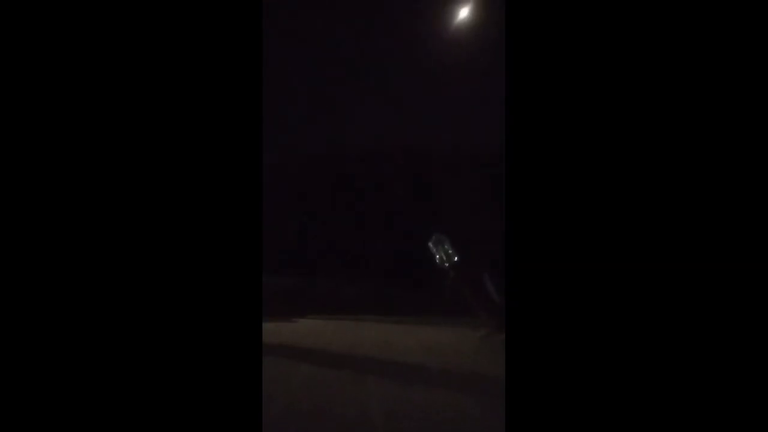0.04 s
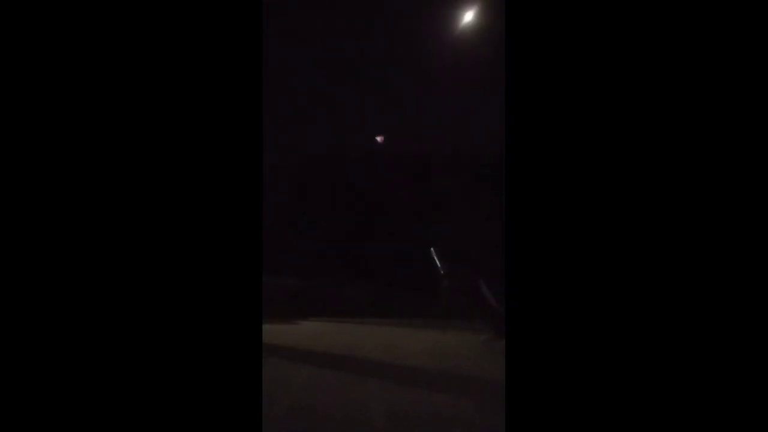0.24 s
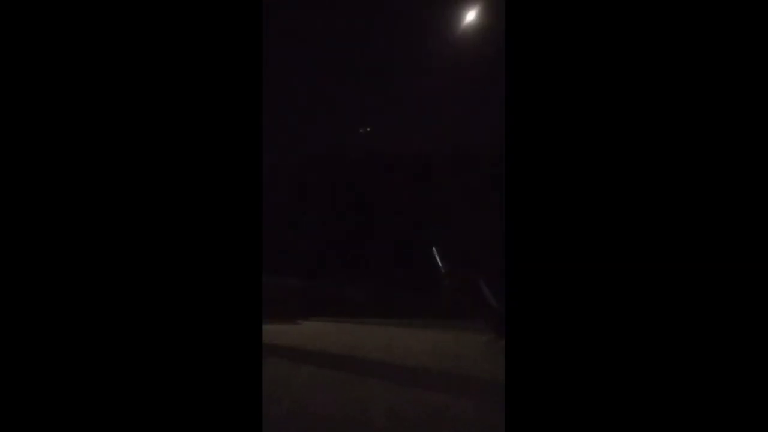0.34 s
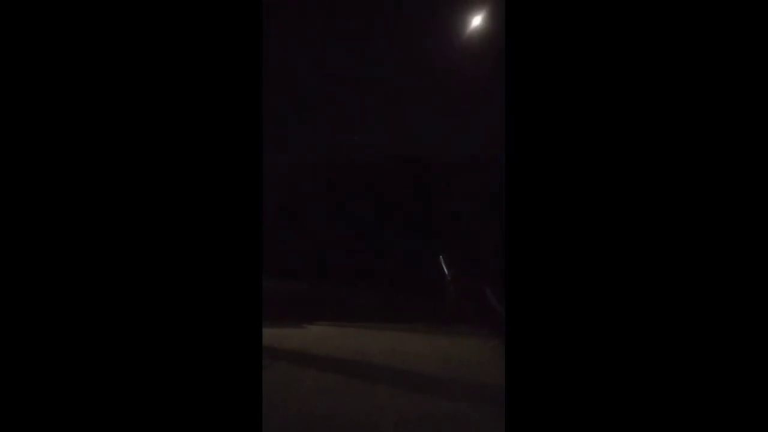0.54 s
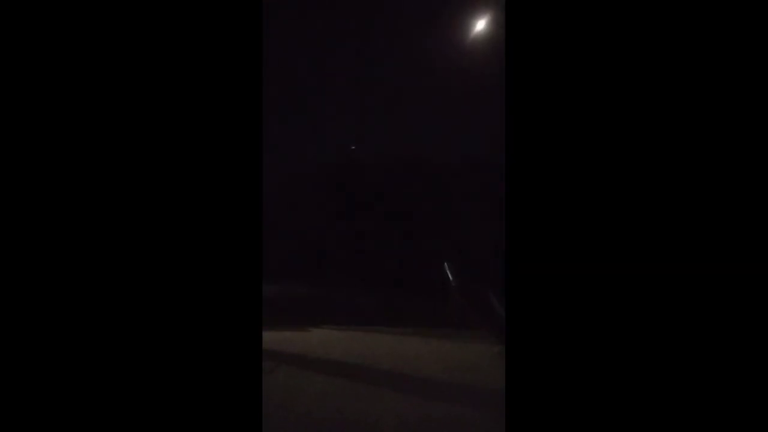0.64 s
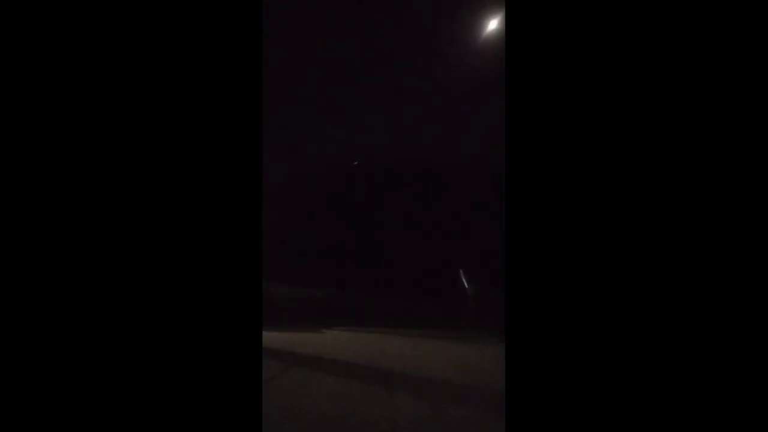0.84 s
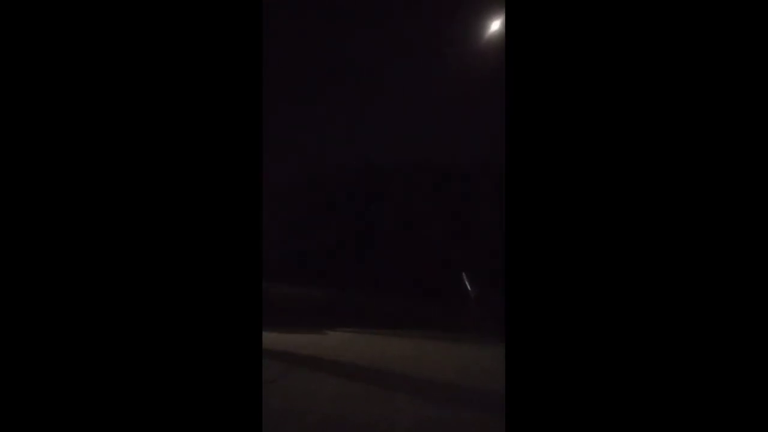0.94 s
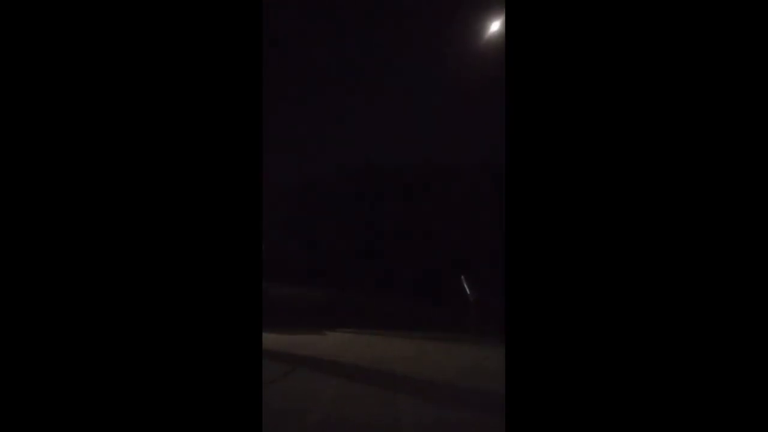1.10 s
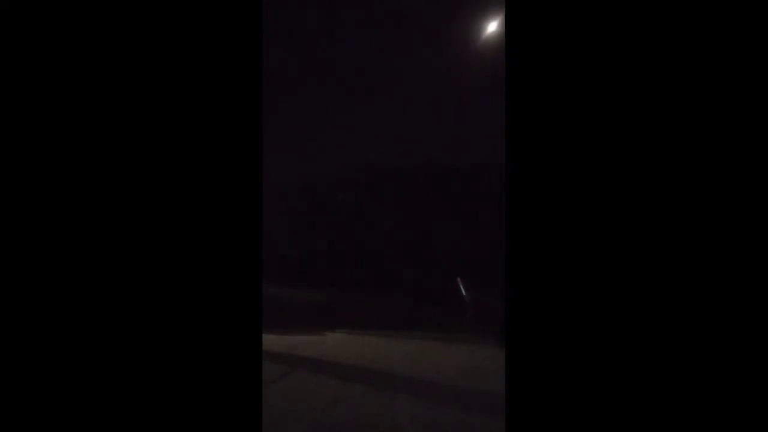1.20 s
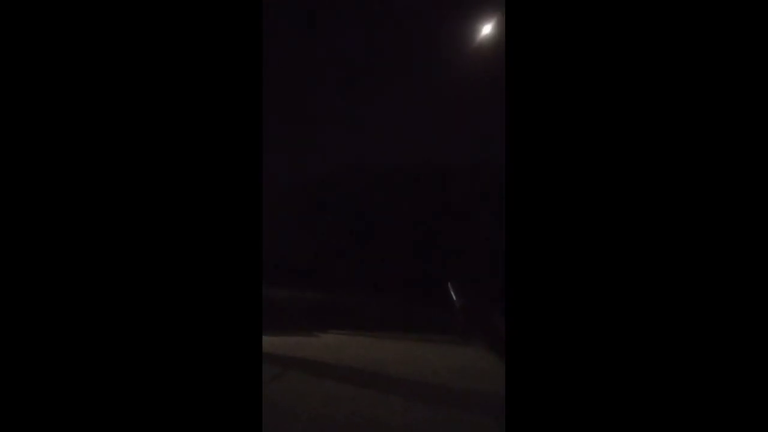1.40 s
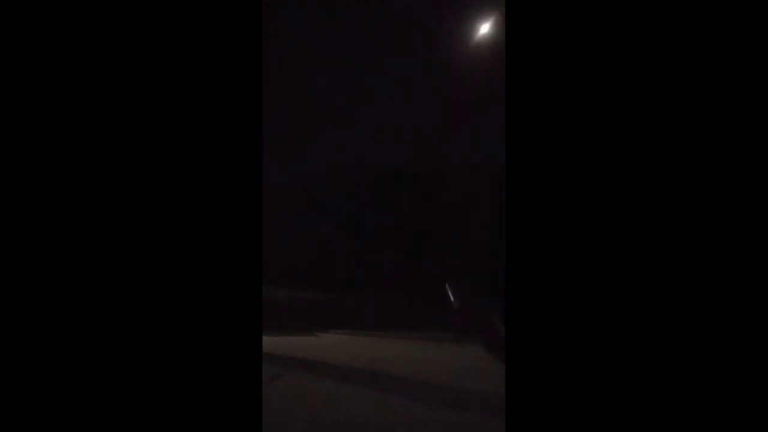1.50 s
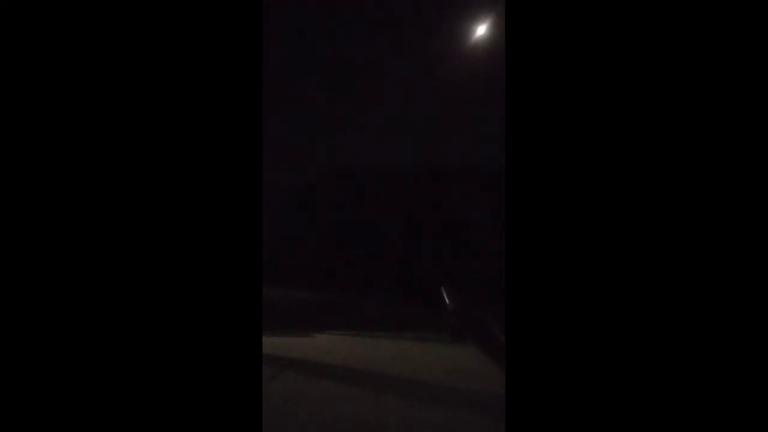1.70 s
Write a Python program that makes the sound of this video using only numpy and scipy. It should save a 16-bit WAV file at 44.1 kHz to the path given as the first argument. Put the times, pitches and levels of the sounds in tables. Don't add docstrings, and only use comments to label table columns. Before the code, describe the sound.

A vapour explosion in a plastic bottle: a small click, then at once a tearing crack with hollow boom, overloading the microphone, slapping off walls and rushing away through trees; faint crickets and katydids outdoors.

```python
import sys
import numpy as np
from scipy import signal
from scipy.fft import rfft, irfft
from scipy.io import wavfile
from scipy.ndimage import uniform_filter1d

SR = 44100
rng = np.random.default_rng(int(sys.argv[2]) if len(sys.argv) > 2 else 0)


def inscribe(sig):
    pcm = np.round(np.clip(np.atleast_2d(sig).T, -1, 1) * 32767)
    wavfile.write(sys.argv[1], SR, pcm.astype(np.int16))


def boost_factor(decibels):
    exponent = np.asarray(decibels, float) / 20
    return 10 ** exponent


N = 77175
T = np.arange(N) / SR

# frequency in Hz, level in dB per Hz.
CRACK_SPECTRUM = [(88, -36.5), (150, -2.5), (601, -3.5), (2650, -13.5), (6020, -16.5), (7920, -29),
                  (12400, -33.5), (14800, -27), (16000, -39)]


def rms_one(x):
    return x / np.sqrt(np.mean(x ** 2) + 1e-20)


def at_hz(points, hz):
    table = np.array(points)
    return np.interp(np.log(hz), np.log(table[:, 0]), table[:, 1])


def drift(rate_hz):
    r = np.exp(-80 * np.pi * rate_hz / SR)
    slow = signal.lfilter([1], [1, -2 * r, r * r], rng.standard_normal(N // 40 + 2002))[2000:]
    return np.interp(np.arange(N) / 40, np.arange(len(slow)), rms_one(slow))


def ring(x, hz, t60_s):
    r = boost_factor(-60 / (t60_s * SR))
    w = 2 * np.pi * hz / SR
    return signal.lfilter([0, np.sin(w)], [1, -2 * r * np.cos(w), r * r], x + 1e-18)


def soften(x, hz):
    return signal.lfilter(*signal.butter(2, min(hz, .45 * SR), fs=SR), x)


def clicks(times_s, size):
    out = np.zeros(N)
    np.add.at(out, (np.asarray(times_s) * SR).astype(int), size)
    return out


def burst(start_s, rise_s, hold_s, t60_s):
    attack = np.clip((T - start_s) / rise_s, 0, 1)
    falling_s = np.clip(T - start_s - rise_s - hold_s, 0, 5 * t60_s)
    return attack * boost_factor(-60 * falling_s / t60_s) * (T < start_s + 5 * t60_s + .05)


def coloured(spectrum):
    hz = np.maximum(np.fft.rfftfreq(N, 1 / SR), 1)
    inside = (hz >= spectrum[0][0]) & (hz <= spectrum[-1][0])
    return rms_one(irfft(rfft(rng.standard_normal(N)) * boost_factor(at_hz(spectrum, hz)) * inside, N))


def narrow(hz, width_hz):
    t60_s = np.log(1000) / (np.pi * width_hz)
    white = rng.standard_normal(N + 4000)
    return rms_one(ring(ring(white, hz, t60_s), hz, t60_s)[4000:])


def evened(x, size):
    local_rms = np.sqrt(uniform_filter1d(x ** 2, size=size))
    return x / np.sqrt(local_rms + 0.027)


def night():
    # frequency in Hz, level in dB per Hz.
    floor_spectrum = [(20, -21), (91, -1), (300, -7), (1000, -19), (2500, -26.5), (5000, -30),
                      (9000, -32.5), (16000, -39.5)]
    # time in seconds, rumble level in dB.
    rumble_level = [(0, -59.5), (.04, -63), (.08, -60.5), (.17, -77.5), (.50, -58), (.54, -63), (.58, -51),
                    (.75, -81), (.82, -63.5), (.86, -68), (.92, -66.5), (.98, -76), (1.04, -66),
                    (1.12, -80), (1.21, -62.5), (1.25, -73), (1.29, -63.5), (1.35, -74), (1.385, -68),
                    (1.46, -82), (1.56, -63.5), (1.63, -70), (1.69, -81.5), (1.75, -69)]
    floor_db, rumble_hz, rumble_width_hz = -74.5 - 1.5, 88, 75
    rumble = evened(narrow(rumble_hz, rumble_width_hz), size=1500)
    return boost_factor(floor_db) * coloured(floor_spectrum) + boost_factor(np.interp(T, *np.transpose(rumble_level))) * rumble


def stroke(start_hz):
    length_s, fall = .014, .12
    u = np.arange(int(length_s * SR)) / (length_s * SR)
    return np.sin(np.pi * u) * np.sin(2 * np.pi * start_hz * length_s * (u - fall * u * u / 2))


def katydids():
    # frequency in Hz, level in dB per Hz.
    rasp_spectrum = [(3410, -38), (5800, -18.5), (5990, -12.5), (6290, -1), (6730, -0.5), (7400, -0.5),
                     (8860, -16.5), (9500, -21), (12400, -56.5), (20900, -120)]
    # start in seconds, start pitch in Hz, level in dB.
    near_strokes = [(1.015, 7950, -82), (1.105, 8110, -77), (1.195, 7970, -72), (1.275, 7890, -80),
                    (1.357, 7290, -66), (1.396, 7246, -63.5), (1.437, 7254, -64.5), (1.478, 8103, -79),
                    (1.572, 8220, -74), (1.605, 7580, -73), (1.66, 8165, -71)]
    rasp_db, far_per_s = -74, 260
    born = (rng.random(N) < far_per_s / SR) * boost_factor(3.0 * np.minimum(rng.exponential(1, N), 4))
    pitches_hz, dealt = np.linspace(6800, 8500, 12), rng.integers(0, 12, N)
    far = 0
    for k, hz in enumerate(pitches_hz):
        strokes = signal.fftconvolve(born * (dealt == k), stroke(hz))[:N]
        far = far + boost_factor(at_hz(rasp_spectrum, .95 * hz)) * strokes
    out = boost_factor(rasp_db - 3 + 1.2 * drift(4)) * (coloured(rasp_spectrum) + boost_factor(-2) * rms_one(far))
    for start_s, hz, db in near_strokes:
        out = out + signal.fftconvolve(clicks([start_s], boost_factor(db)), stroke(hz))[:N]
    return out


def crickets():
    # time in seconds, level in dB.
    trill_level = [(.80, -78), (0.889, -66), (.94, -78.5), (1.06, -64.5), (1.18, -77.5), (1.23, -70.5),
                   (1.34, -74), (1.40, -77), (1.46, -68), (1.56, -69.5), (1.62, -80.5), (1.689, -69),
                   (1.75, -71.5)]
    early_db, trill_hz, trill_width_hz = -72, 5395, 75
    chorus_db, chorus_width_hz = -77, 170
    times_s, db = np.transpose(trill_level)
    throb = boost_factor(np.interp(T, np.r_[.2, times_s], np.r_[early_db, db]))
    near = evened(narrow(trill_hz, trill_width_hz), size=600)
    return throb * near + boost_factor(chorus_db) * narrow(trill_hz - 40, chorus_width_hz)


def late():
    # start in seconds, length in seconds, frequency in Hz, level in dB.
    swells = [
        (.325, .055, 2150, -58),
        (.87, 0.041, 619, -68),
        (0.801, 0.16, 628, -72.5),
        (1.00, 0.17, 320, -74.5),
        (1.016, 0.094, 656, -80.5),
        (1.099, 0.071, 1056, -82),
        (1.181, 0.16, 1476, -88.5),
        (1.311, 0.052, 697, -81.5),
    ]
    sharpness = 9.17
    out = 0
    for start_s, length_s, hz, db in swells:
        swell = np.sin(np.pi * np.clip((T - start_s) / length_s, 0, 1))
        out = out + boost_factor(db) * narrow(hz, hz / sharpness) * swell
    return out


def hollow(x):
    # frequency in Hz, width in Hz, lift in dB.
    hollows = [(330, 60, 4), (630, 90, 9), (1400, 200, 5), (1950, 200, 5), (2250, 200, -8), (2720, 150, 6),
               (3200, 250, 5), (3480, 120, -9), (4100, 200, -6), (4500, 300, 4), (7500, 500, 5),
               (12800, 2500, -6), (15200, 1000, 12)]
    hz = np.fft.rfftfreq(N, 1 / SR)
    lift_db = sum(db / (1 + (2 * (hz - centre_hz) / width_hz) ** 2) for centre_hz, width_hz, db in hollows)
    return irfft(rfft(x) * boost_factor(lift_db), N)


def rush():
    # time in seconds, level in dB.
    rush_level = [(.292, -87), (.325, -58), (.345, -50), (.385, -51), (.40, -41.5), (0.459, -44),
                  (.52, -48.5), (0.602, -51.5), (.70, -55.5), (.80, -58.5), (.90, -68), (.93, -73.5),
                  (1.4, -91.5)]
    # frequency in Hz, level in dB per Hz.
    rush_spectrum = [(35, -36), (60, -14), (216, -2.5), (535, -6), (629, -2.5), (758, -16.5), (1830, -12.5),
                     (6150, -16), (15600, -53)]
    # frequency in Hz, change in dB per second.
    air_loss = [(60, 1), (330, -5.5), (650, -0.5), (2000, -1), (6000, -13), (9000, -40), (15000, -66)]
    times_s, db = np.transpose(rush_level)
    peak_s, settled_s = times_s[4], times_s[5]
    age_s = np.maximum(T - peak_s, 1.7 * (peak_s - T))
    edges_hz = 50 * 2 ** np.arange(0, 8.6, .5)
    white, shared, out = rng.standard_normal((2, N)), drift(30), 0
    for k, (low, high) in enumerate(zip(edges_hz, edges_hz[1:])):
        hz = np.sqrt(low * high)
        band = signal.sosfilt(signal.butter(2, [low, high], "band", fs=SR, output="sos"), white[k % 2])
        flutter_db = .3 * shared + 2.0 * drift(12)
        out = out + band * boost_factor(at_hz(rush_spectrum, hz) + at_hz(air_loss, hz) * age_s + flutter_db)
    out = hollow(out)
    level = boost_factor(np.interp(T, times_s, db, right=-140)) * (T > times_s[0])
    return level * out / np.std(out[int(peak_s * SR):int(settled_s * SR)])


def slaps():
    # start in seconds, level in dB, length in seconds, brightness in Hz.
    wall_slaps = [(0.3113, -35, 0.0053, 7000), (0.317, -27.5, 0.0034, 10000), (0.383, -38.5, 0.0071, 3900),
                  (0.393, -28.5, 0.0062, 7460), (0.398, -32, 0.0091, 4220), (0.422, -57, .008, 5000),
                  (0.443, -41, 0.0089, 7200), (0.516, -49, 0.0068, 5000), (0.584, -43, 0.0038, 9000),
                  (0.601, -50.5, 0.0081, 5030), (.7060, -53.5, .006, 5050)]
    # start in seconds, level in dB, frequency in Hz, t60 in seconds.
    thumps = [(0.3165, -21, 1950, .018), (.3160, -30, 1250, .02), (.2915, -27, 430, .03),
              (.2985, -29.5, 250, .06), (0.3178, -21, 265, .035), (.3350, -38.5, 230, .1),
              (.3620, -36, 290, .06), (.5600, -35, 130, 0.07), (.3172, -29, 560, .025),
              (0.381, -27, 197.5, 0.081), (.3950, -23.5, 314, 0.012), (.3960, -25.5, 650, 0.063),
              (.4006, -28.5, 650, 0.04), (.4040, -29.5, 435, .03), (0.48, -31, 340, 0.028),
              (.4410, -37.5, 640, 0.072), (0.36, -34, 964, 0.012), (.3950, -36, 2900, .02),
              (.4660, -38, 550, .03), (0.4785, -32, 1470, 0.021), (.4810, -28.5, 406, 0.012),
              (0.54, -27.5, 560, 0.0094), (0.5827, -31.5, 240, 0.022), (0.604, -47, 320, 0.038)]
    # start in seconds, level in dB, frequency in Hz, t60 in seconds.
    snap_returns = [
        (.2458, -28, 1550, .008),
        (.2490, -23.5, 1300, .01),
        (.2530, -36, 1700, .01),
        (.2480, -40, 3700, .012),
        (.2400, -36, 560, 0.018),
    ]
    slap_t60_s, thin_hz = 0.011, 130
    white, out = coloured(CRACK_SPECTRUM), 0
    for start_s, db, length_s, bright_hz in wall_slaps:
        shape = burst(start_s, 0.25 * length_s, 0.64 * length_s, slap_t60_s)
        out = out + boost_factor(db) * rms_one(soften(white, bright_hz)) * shape
    for start_s, db, hz, t60_s in [*thumps, *snap_returns]:
        out = out + soften(ring(clicks([start_s], boost_factor(db)), hz, t60_s), 1.57 * hz)
    return signal.lfilter(*signal.butter(2, thin_hz, "high", fs=SR), out)


def sparker():
    # frequency in Hz, level in dB, t60 in seconds.
    wall_modes = [(520, -19, .014), (960, -10, .012), (1025, -4, .03), (1750, -9, .008), (1933, -3, .014),
                  (1417, -19, .025), (2338, -17, .025), (2780, -18, .02), (3252, -29, .035),
                  (4130, -19, .01), (5073, -27, .012), (6498, -25, .014), (10400, -26, .008)]
    # delay in seconds, level in dB.
    slips = [
        (-.0022, -32),
        (-.0006, -16),
    ]
    # level in dB, t60 in seconds.
    buzz_decays = [
        (-33, .018),
        (-48, .16),
    ]
    # frequency in Hz, level in dB per Hz.
    buzz_spectrum = [(1200, -6), (2000, -0.5), (3300, -0.5), (4500, -7), (7000, -10.5), (9000, -14),
                     (10500, -10), (12000, -22), (15600, -23.5)]
    snap_s, snap_db, soft_hz, thin_hz = .2339, -8, 7000, 460
    delay_s, db = np.transpose([(0, 0), *slips])
    hit = soften(clicks(snap_s + delay_s, boost_factor(snap_db + db)), soft_hz)
    wall = sum(boost_factor(d) * ring(hit, hz, t60_s) for hz, d, t60_s in wall_modes)
    buzz = coloured(buzz_spectrum) * sum(boost_factor(d) * burst(snap_s, .0004, 0, t60_s) for d, t60_s in buzz_decays)
    return signal.lfilter(*signal.butter(3, thin_hz, "high", fs=SR), wall) + buzz


def bang():
    # start in seconds, level in dB, rise, hold and t60 in seconds.
    fronts = [
        (0.268, -32.5, 0.003, 0.0026, .01),
        (0.2727, -15.5, 0.0011, 0.0034, 0.013),
        (.2760, -9, 0.0023, 0.0028, .006),
        (0.2844, -18.5, 0.00084, 0.0024, 0.0068),
        (0.289, -29.5, 0.0032, 0.001, 0.012),
    ]
    # start in seconds, swell in seconds, level in dB, frequency in Hz, t60 in seconds.
    air_modes = [
        (0.2727, .002, -13, 434, .08),
        (.2726, 0.00081, -14, 735, .05),
        (.2759, 0.0043, -8, 587.5, .15),
        (0.2772, 0.0045, -11, 282.6, .4),
        (.2788, .006, -12.5, 112, .3),
    ]
    tear_thin_hz = 720
    drop_s, drop_fall_s, drop_db, after_t60_s = .2880, 0.0015, -20, .09
    drop_lag_cycles = .17
    tear = coloured(CRACK_SPECTRUM) * sum(boost_factor(db) * burst(s, rise, hold, t60) for s, db, rise, hold, t60 in fronts)
    out = signal.sosfilt(signal.butter(4, tear_thin_hz, "high", fs=SR, output="sos"), tear)
    for start_s, swell_s, db, hz, t60_s in air_modes:
        since_s = np.maximum(T - drop_s - drop_lag_cycles / hz, 0)
        drop = boost_factor(drop_db * np.minimum(since_s / drop_fall_s, 1) - 60 * since_s / after_t60_s)
        tone = np.sin(2 * np.pi * hz * (T - start_s))
        out = out + boost_factor(db) * drop * burst(start_s, swell_s, 0, t60_s) * tone
    return out


def scene():
    duck_s, duck_db, recover_s = .235, -15, .8
    duck = boost_factor(np.interp(T, [duck_s, duck_s + .005, recover_s], [0, duck_db, 0]))
    background = duck * (night() + katydids() + crickets())
    echoes = late() + rush() + slaps()
    return (background + echoes + sparker() + bang())[None]


def band_limit(x):
    return signal.sosfilt(signal.butter(12, 16800, fs=SR, output="sos"), x)


def record(dry):
    low_cut_hz, clip_top, top_hz = 85, .69, 16200
    x = signal.lfilter(*signal.butter(2, low_cut_hz, "high", fs=SR), dry)
    flattened = x / (1 + np.abs(x / clip_top) ** 6) ** (1 / 6)
    mix = signal.sosfilt(signal.cheby2(8, 30, top_hz + 400, fs=SR, output="sos"), flattened)
    return band_limit(mix)


dry = scene()
out = record(dry)
inscribe(out)
```